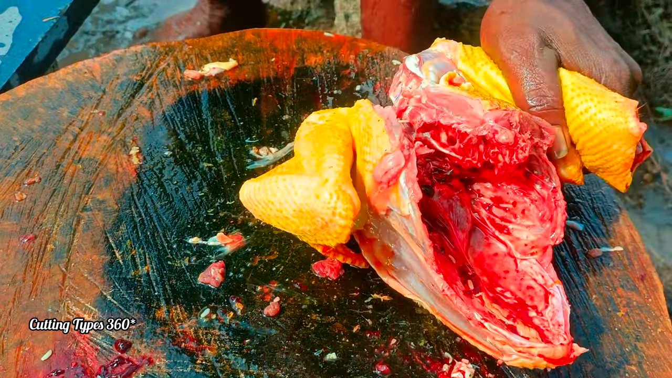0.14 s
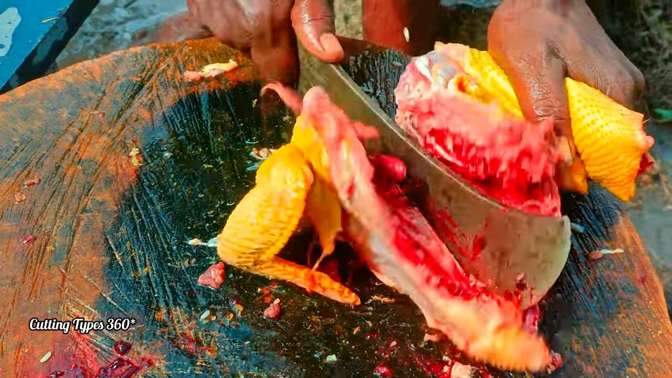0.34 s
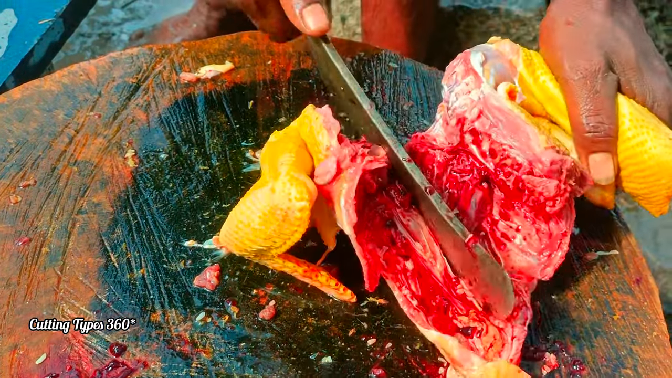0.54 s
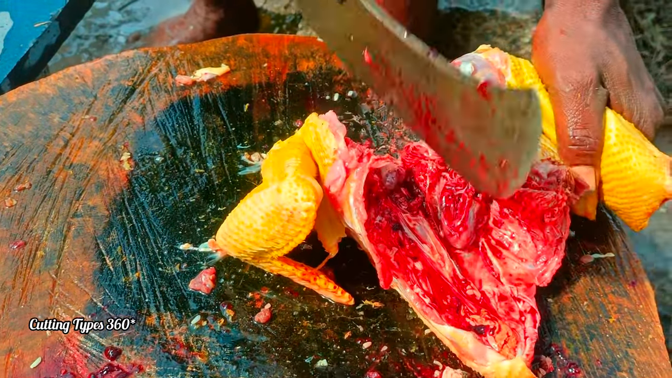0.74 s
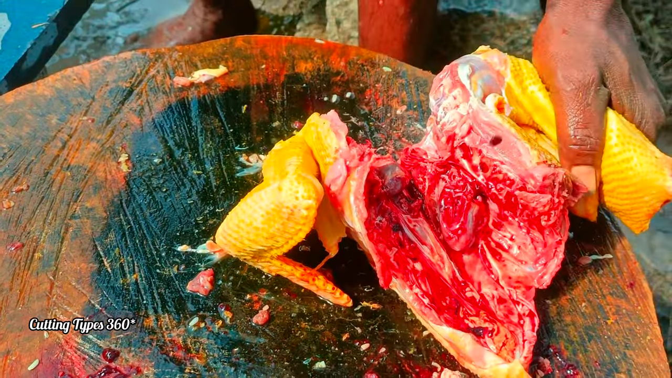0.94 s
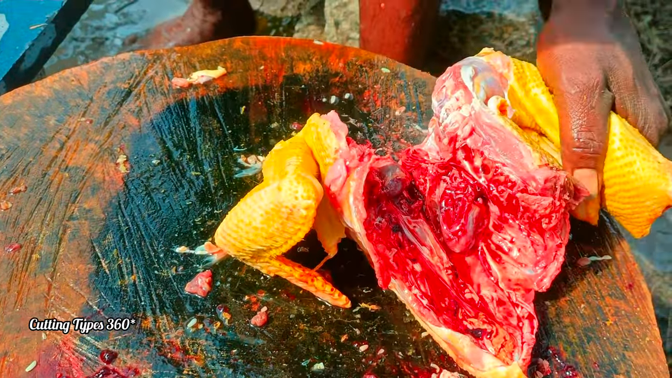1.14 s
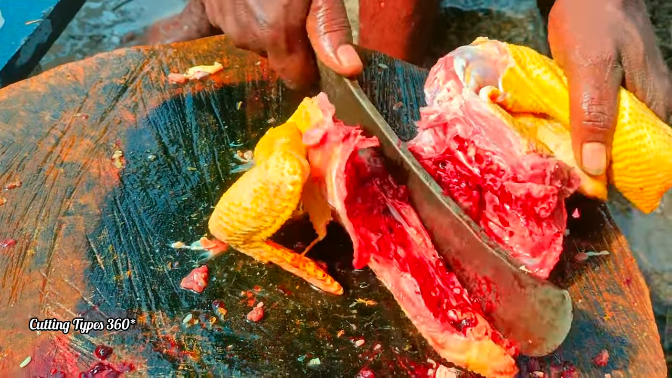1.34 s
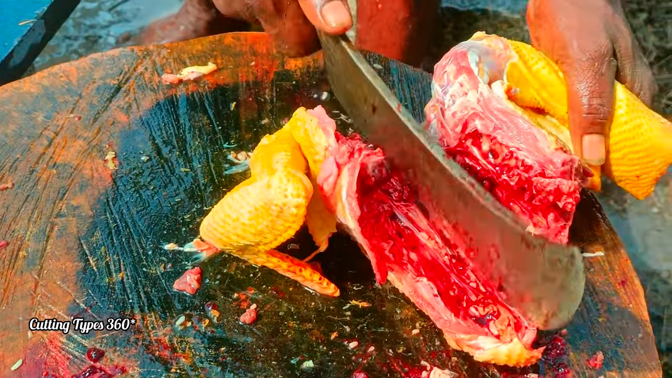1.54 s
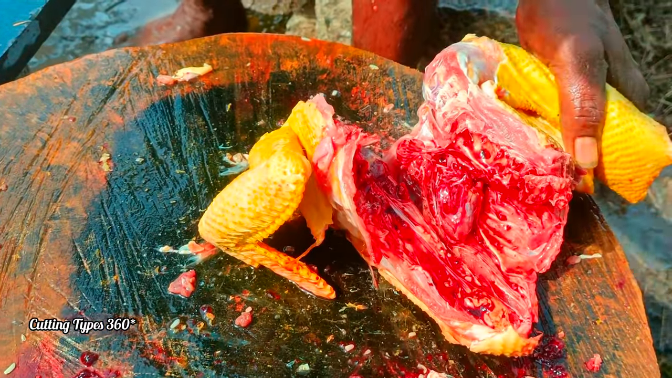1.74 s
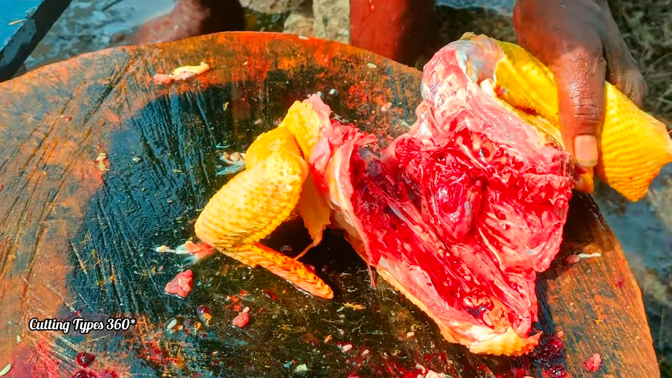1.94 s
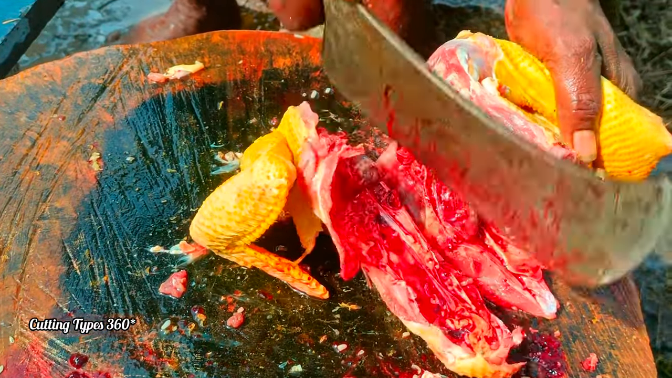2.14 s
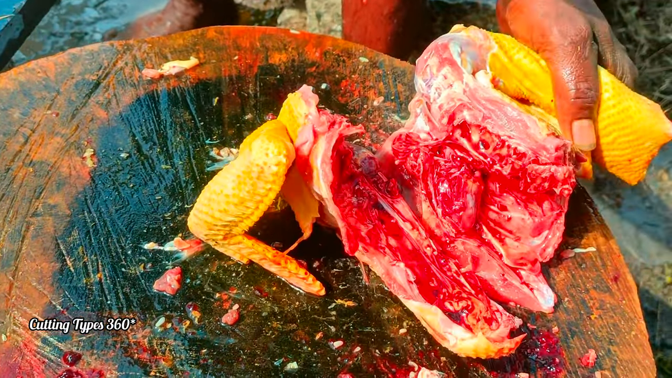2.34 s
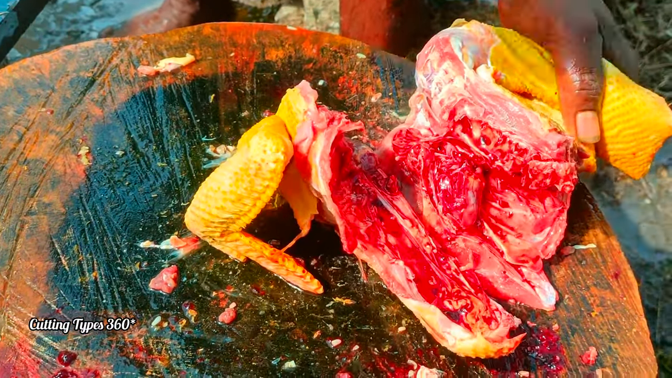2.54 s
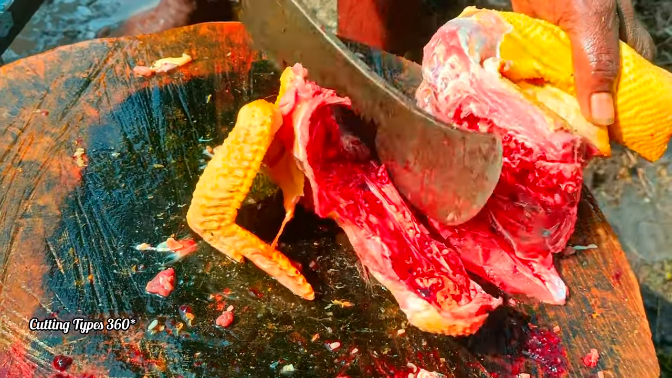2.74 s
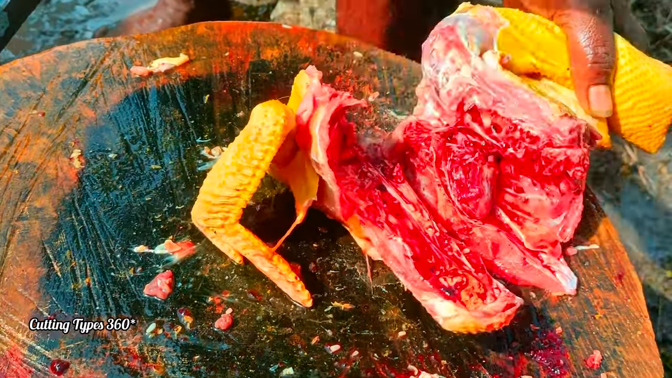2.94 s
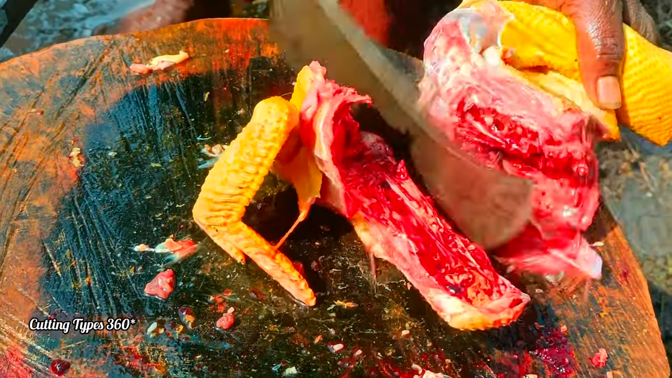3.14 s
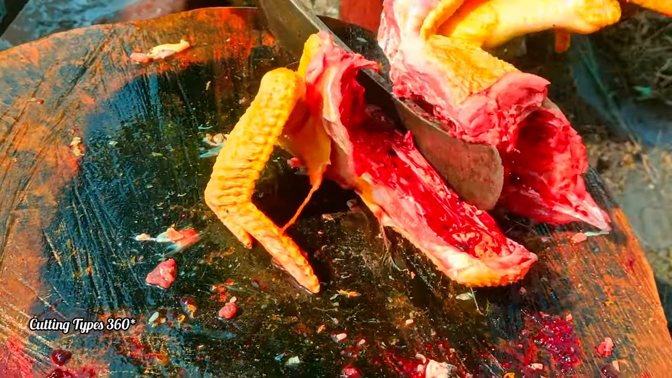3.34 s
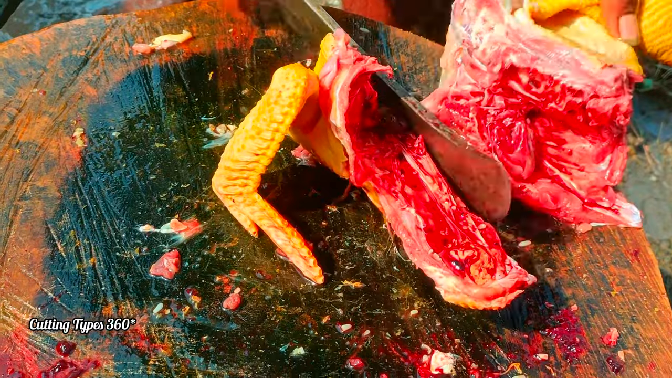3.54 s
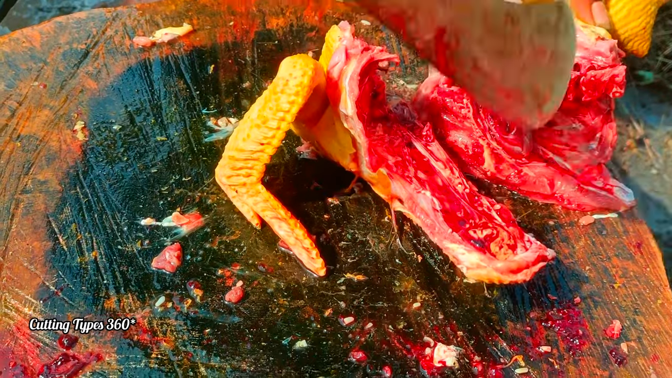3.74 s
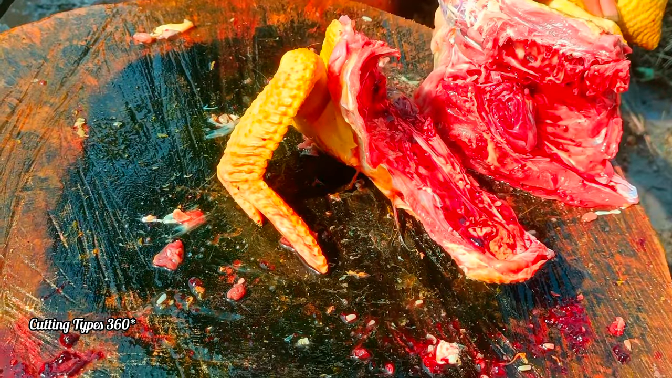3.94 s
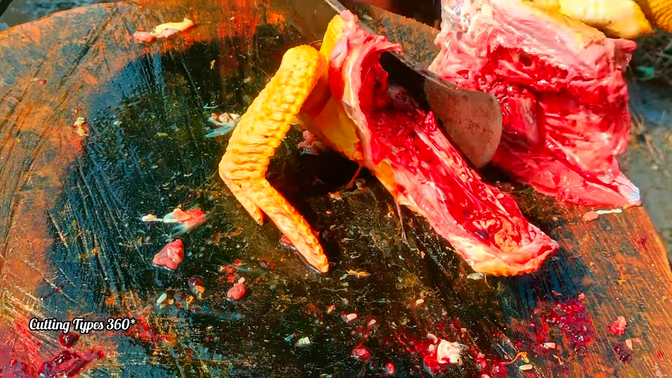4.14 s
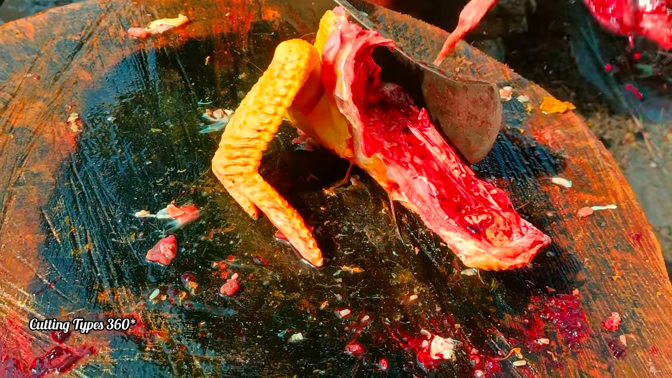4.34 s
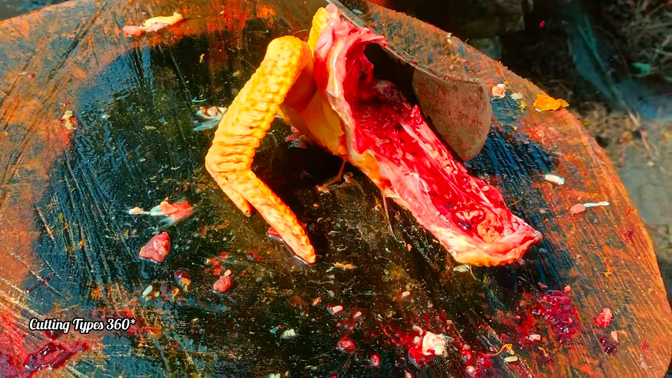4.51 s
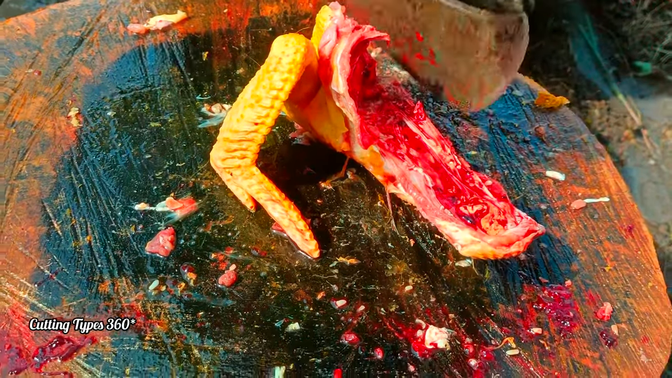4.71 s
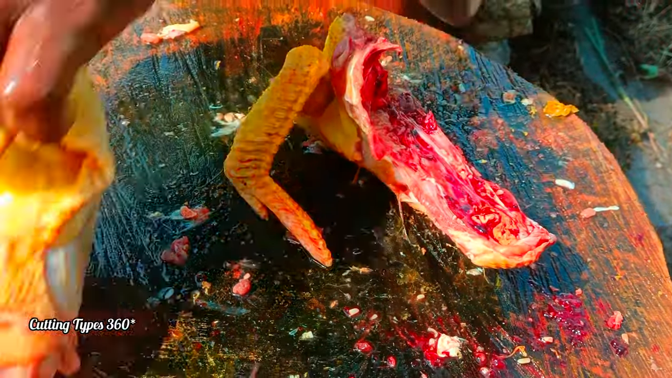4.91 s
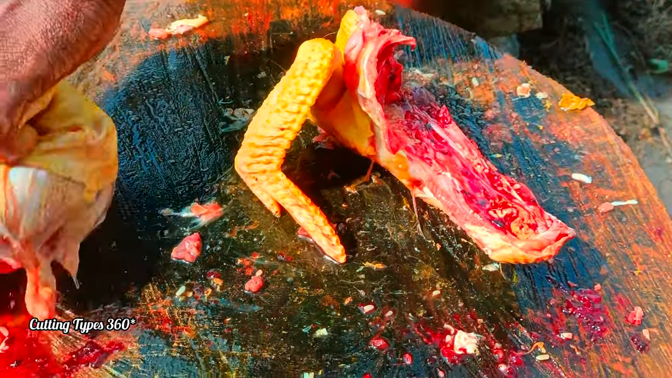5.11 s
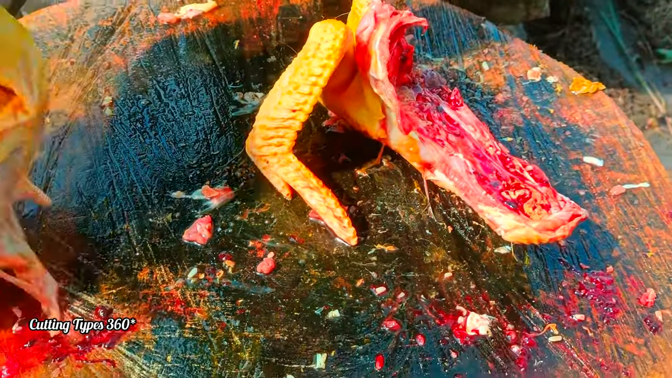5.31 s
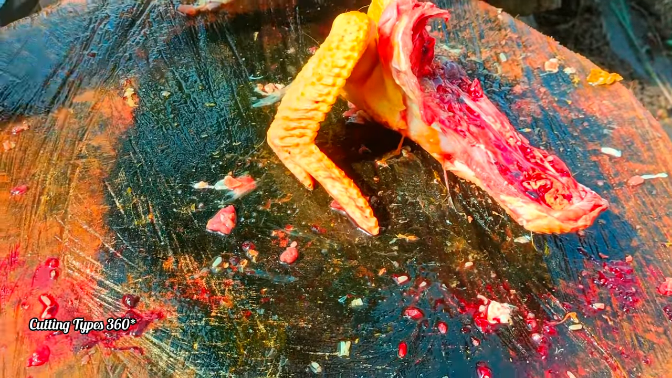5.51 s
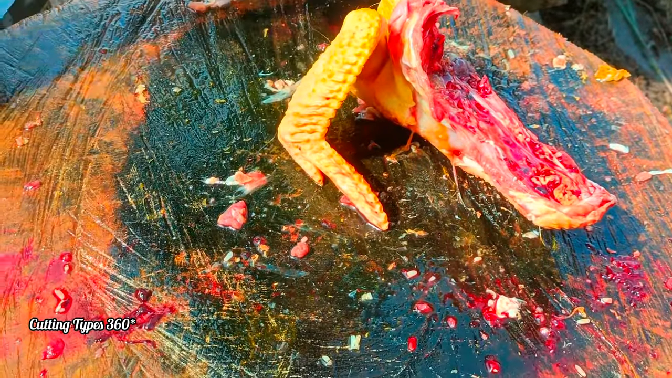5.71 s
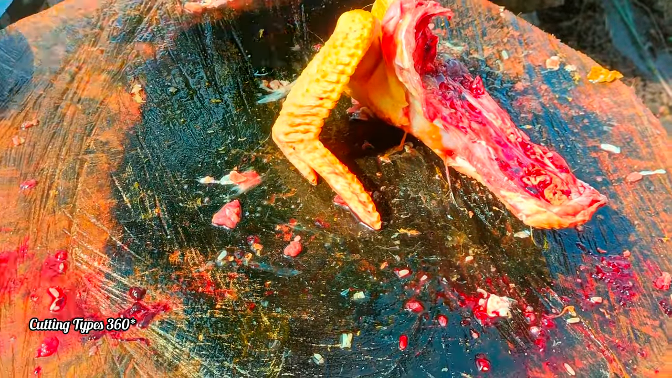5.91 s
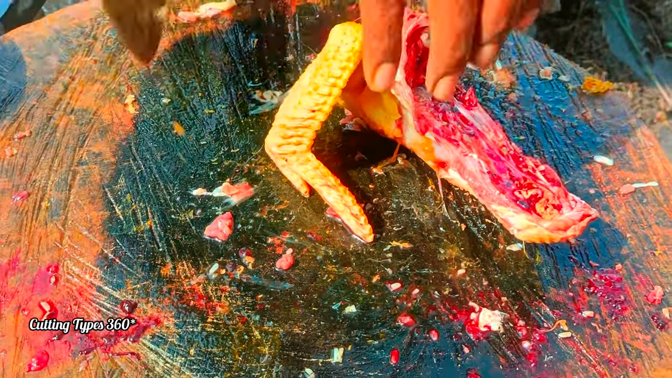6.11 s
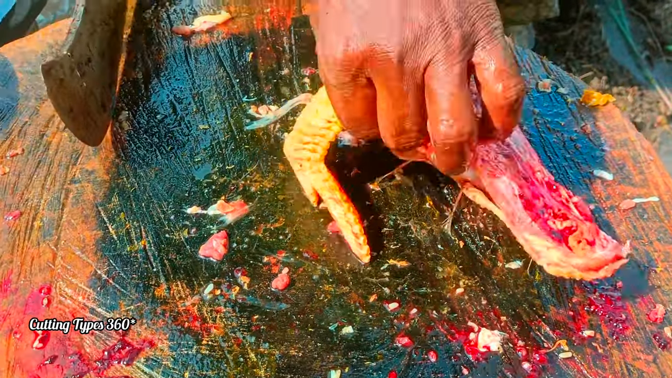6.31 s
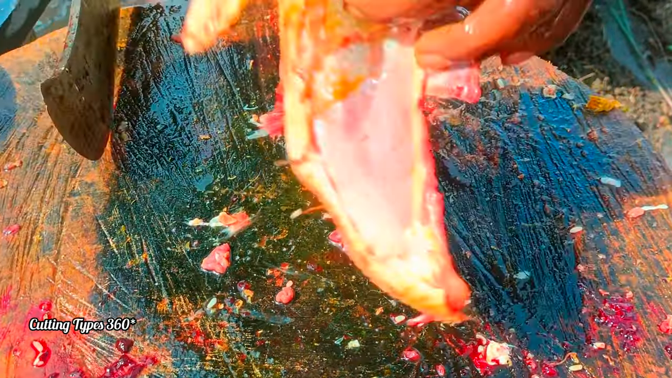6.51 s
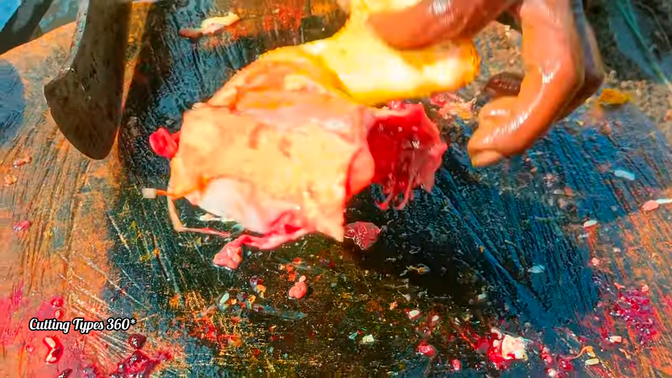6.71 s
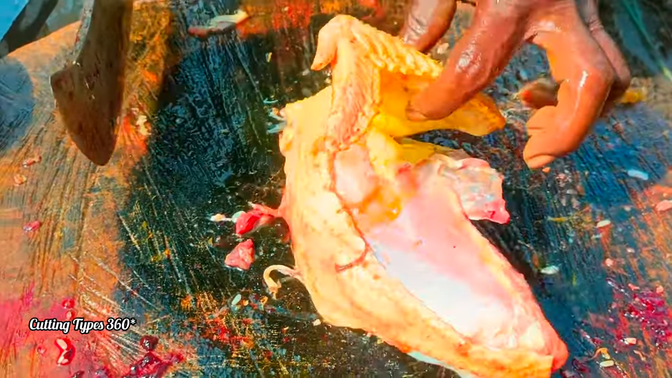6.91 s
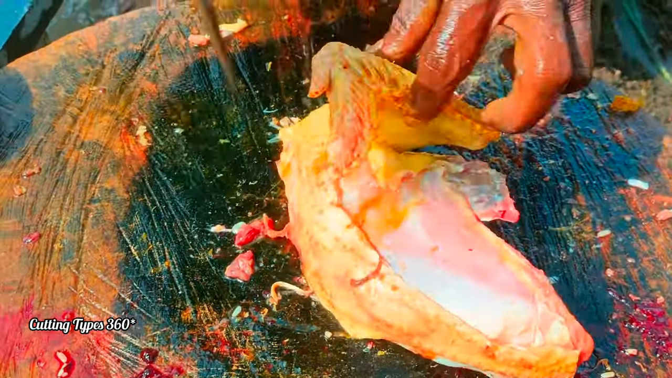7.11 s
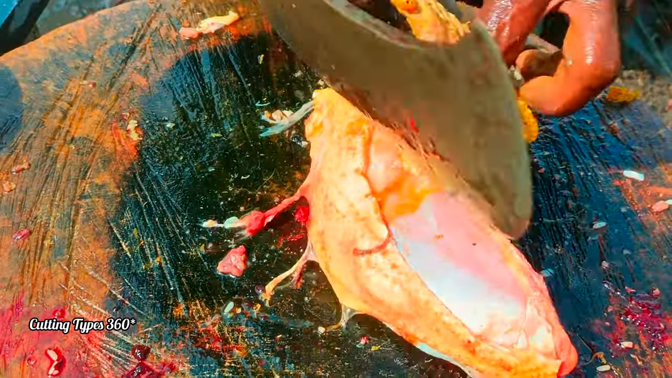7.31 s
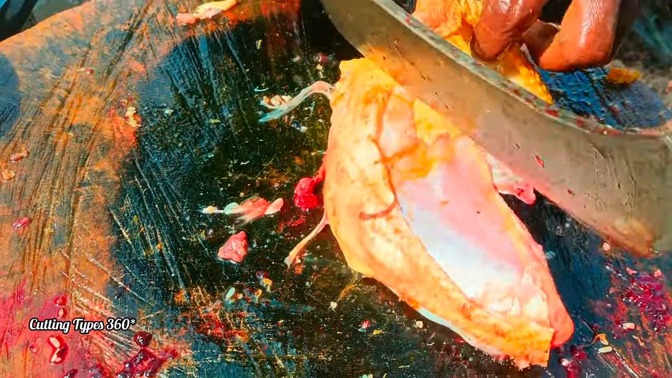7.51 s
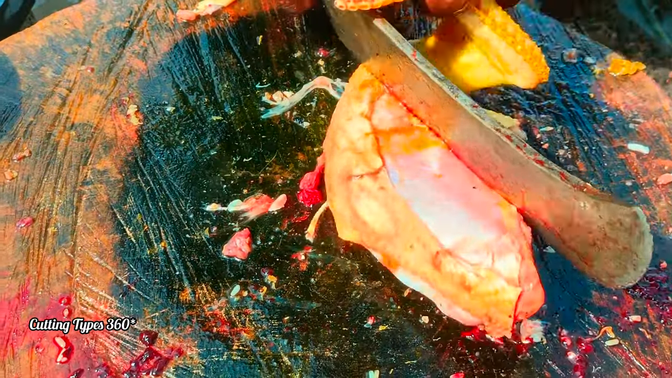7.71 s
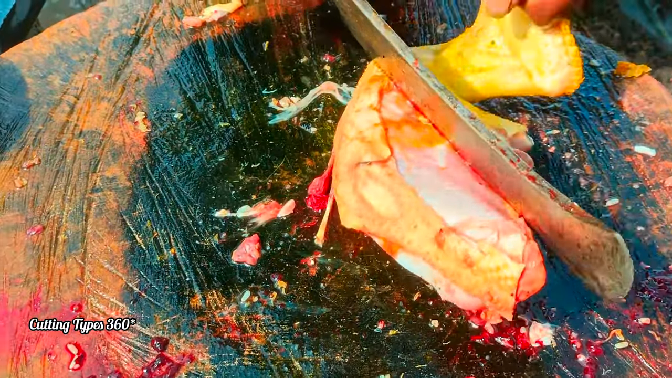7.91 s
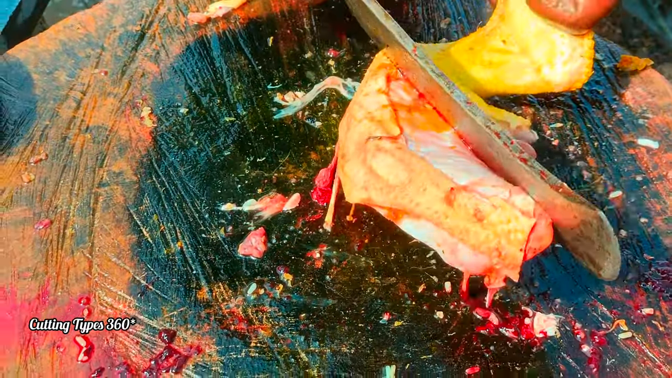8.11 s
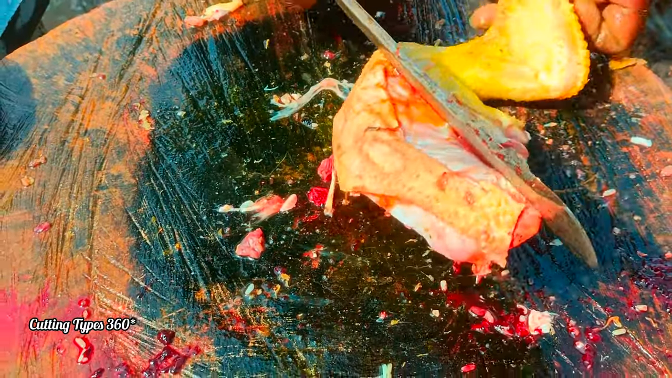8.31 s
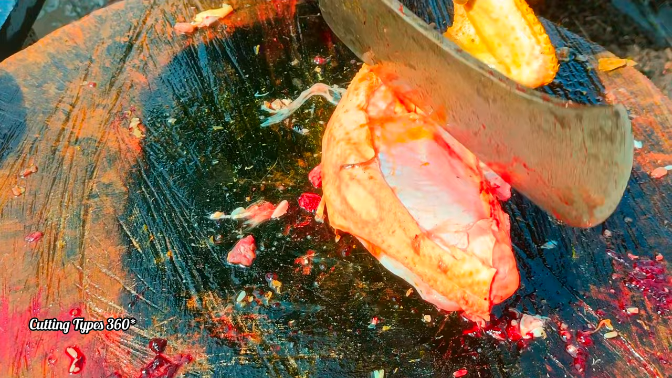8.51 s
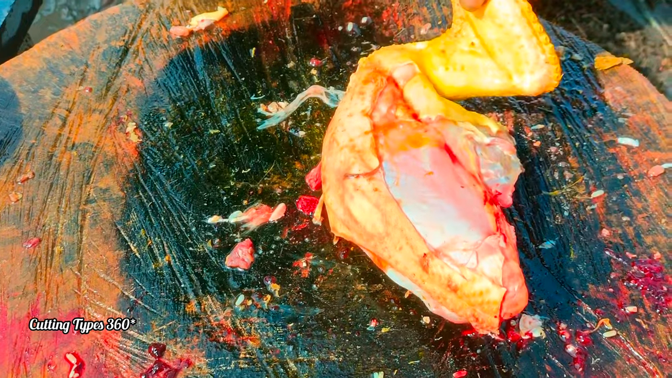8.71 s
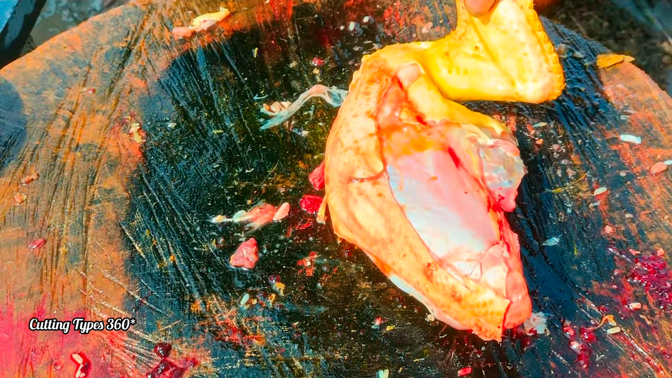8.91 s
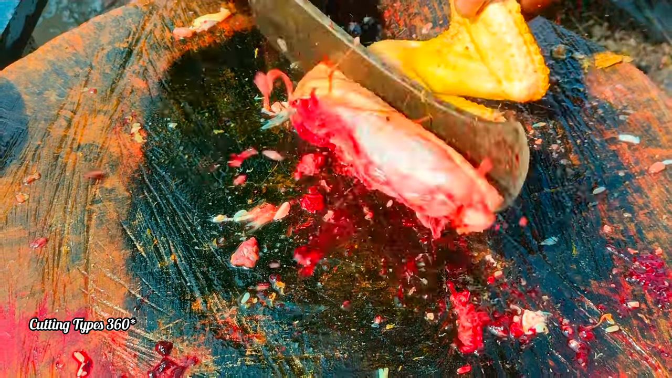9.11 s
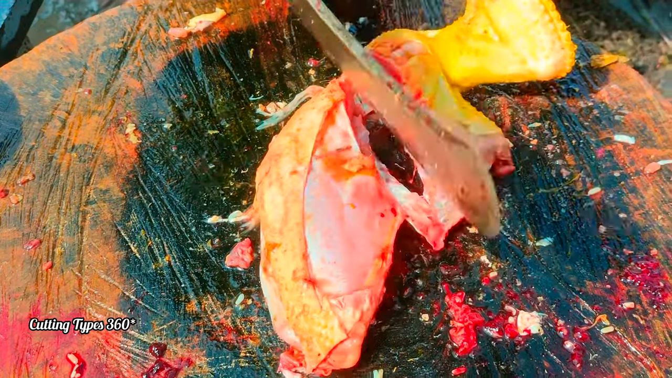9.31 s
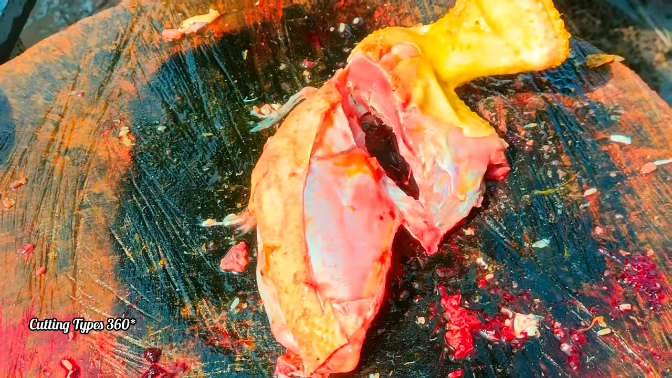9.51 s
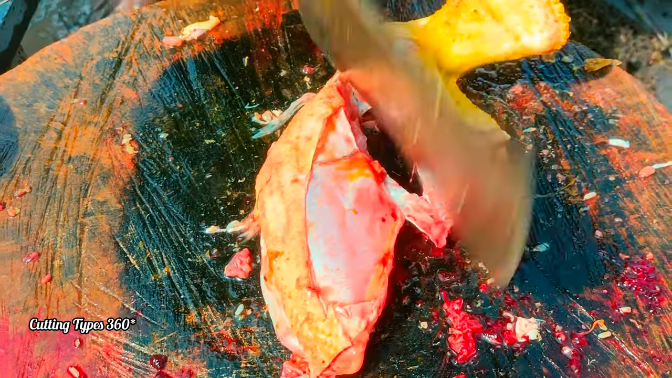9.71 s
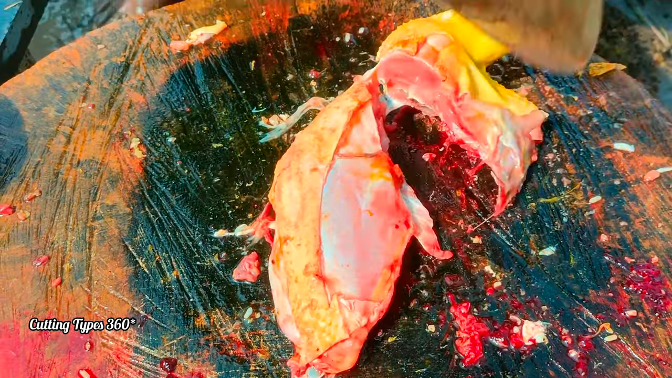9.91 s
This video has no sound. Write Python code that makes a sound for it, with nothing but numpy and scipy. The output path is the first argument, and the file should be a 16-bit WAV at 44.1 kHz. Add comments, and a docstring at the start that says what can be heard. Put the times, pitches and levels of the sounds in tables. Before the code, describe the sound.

Separate cleaver strokes land on a thick wooden block, each a tight bony crack with a hard woody thud and brief metallic edge. Small scrapes, ticks and wet presses fill the pauses. In the middle the chopping stops, leaving a thin surging hiss, faint rustling and a light knock as the blade is set down. Chopping returns near the end. Close stereo microphone, open yard, short wall reflection.

```python
"""Cleaver on a tree-stump block

A heavy cleaver chops a chicken outdoors, heard close up as shaped noise for the crunch through bone and
the ringing blade, then decaying modes for the stump; scattered noise answers from the yard and a wall.
Between chops come damped pops, crackling squelches, scrapes, short ticks and a faint rustle of handling.
For a while a thin noise hiss flutters, surges and whistles over the steady outdoor background."""
import sys
import numpy as np
from scipy import signal
from scipy.fft import rfft, irfft
from scipy.io import wavfile
from scipy.ndimage import uniform_filter1d, minimum_filter1d

SR = 44100
rng = np.random.default_rng(int(sys.argv[2]) if len(sys.argv) > 2 else 0)


def store_wav(level_fs):
    """Save 16-bit WAV to argv[1]."""
    pcm = np.round(np.clip(np.atleast_2d(level_fs), -1, 1) * 32767)
    wavfile.write(sys.argv[1], SR, pcm.T.astype(np.int16))


N = 438794
LEAD_S = .04  # room ahead of each landing for the cut


def amp(db):
    """Decibels to gain."""
    return 10 ** (np.asarray(db) / 20)


def evened(x):
    """Scales to rms 1."""
    return x / np.sqrt(np.mean(x ** 2) + 1e-20)


def read(points, hz, column=1):
    """One column of a spectrum, joined on a log-frequency axis."""
    table = np.transpose(points)
    return np.interp(np.log(hz + 1), np.log(table[0] + 1), table[column])


def freqs(size):
    """Frequencies of the bins of a real transform."""
    return np.fft.rfftfreq(size, 1 / SR)


def colour(x, gain):
    """Filters by a gain per bin."""
    return irfft(rfft(x) * gain, x.shape[-1])


def band(x, hz, octaves):
    """A bell-shaped band around hz, at rms 1."""
    distance = np.log2((freqs(x.shape[-1]) + 1) / hz) / octaves
    return evened(colour(x, np.exp(-.5 * distance ** 2)))


def pan(db):
    """Left and right gains for a left-right level difference."""
    return amp(np.array([[.5], [-.5]]) * db)


def add(mix, s, sound):
    """Adds a sound to the mix at time s."""
    start = round(s * SR)
    part = mix[:, start:start + sound.shape[-1]]
    part += sound[..., :part.shape[1]]


def envelope(start, end, rise, release):
    """Rises from start, holds until end, then dies away."""
    t = np.arange(N) / SR
    return np.clip((t - start) / rise, 0, 1) * np.exp(-np.maximum(t - end, 0) / release)


def waver(hz):
    """Slow random motion of rms 1, up to about hz."""
    return evened(colour(rng.standard_normal(N), np.exp(-(freqs(N) / hz) ** 2)))


def steady(table, likeness=0.69):
    """Partly shared noise, with a spectrum of its own at each microphone port."""
    shared, left, right = rng.standard_normal((3, N))
    noise = evened(likeness * shared + np.array([left, right]))
    spectrum_db = [read(table, freqs(N), 1), read(table, freqs(N), -1)]
    return colour(noise, np.sqrt(SR / 2) * amp(spectrum_db))


def snaps(size, grain_db=5.0, apart=0.9):
    """Dense crackle of grains of uneven size, heard a little differently at each port."""
    grain = amp(grain_db * np.minimum(rng.exponential(1, size), 4))
    shared, left, right = rng.standard_normal((3, size)) * grain
    return shared + apart * np.array([left, right])


def air():
    """Outdoor background of steady noise; its left side sinks near the end."""
    # outdoor spectrum, left before its level curve:
    # (frequency [Hz], left level [dB per Hz], right level [dB per Hz])
    air_spectrum = [(20, -98, -101.5), (119, -90, -85.5), (250, -101, -99), (1010, -101, -96),
                    (2160, -103, -96), (3800, -103, -93.5), (4300, -106, -92.5), (6000, -111, -105),
                    (6500, -110, -121), (7600, -108, -129), (10900, -116, -128), (16000, -121, -119)]
    # level curve of the left side: (time [s], level [dB])
    left_dip = [(0, 2.5), (9.1, 1.5), (9.3, -10), (9.7, -4), (9.95, -10)]
    left, right = steady(air_spectrum)
    left_db = np.interp(np.arange(N) / SR, *np.transpose(left_dip))
    return np.array([left * amp(left_db), right])


def pop(db, hz, t60, octaves=1.0, tick_db=-3, tick_s=.00016, tick_hz=2500):
    """A heavily damped ring, roughened by a band of noise; the louder it is, the more a tick opens it."""
    t = np.arange(SR // 10) / SR
    rough = .3
    onset = np.minimum(t * hz * 2, 1)  # swells over half a cycle
    tone = np.sin(2 * np.pi * hz * t) + rough * band(snaps(len(t)), hz, octaves)
    # db counts twice for the tick: here and in the overall level
    tick = amp(tick_db + db) * np.exp(-t / tick_s) * band(snaps(len(t)), tick_hz, .76)
    return amp(db) * (amp(-60 * t / t60) * onset * tone + tick)


def taps(pop_cycles=3.43, pop_side_db=-29, knock_t60_s=0.017, knock_side_db=1):
    """Damped rings: pops to the right, where low ones last longer, and blade knocks mid-field."""
    # damped pops, a click and low pushes, to the right:
    # (time [s], level before panning [dB], pitch [Hz])
    pops = [(.183, -34, 468), (.283, -14, 314), (.312, -25.5, 88), (2.817, -40, 179.6), (4.366, -38.5, 650),
            (4.509, -20, 530), (4.5259, -12.5, 404), (4.5375, -13, 465), (4.5361, -11.5, 1740),
            (4.5455, -6.5, 3530), (4.5519, -18, 443), (4.558, -23, 340), (4.6004, -36, 380),
            (4.738, -37.5, 686), (4.898, -39, 527), (5.538, -27.5, 4000), (5.645, -39.5, 538),
            (5.823, -43.5, 519), (6.1, -43, 549), (8.278, -29.5, 710), (8.578, -42.5, 489),
            (9.102, -22, 106.3), (9.659, -35, 496)]
    # light knocks of the blade on the block: (time [s], level before panning [dB], pitch [Hz])
    blade_knocks = [(1.352, -37, 910), (4.812, -43.5, 794), (7.5783, -23.5, 1260), (7.6111, -32.5, 1350),
                    (8.5072, -34, 760)]
    out = np.zeros((2, N))
    for s, db, hz in pops:
        add(out, s, pan(pop_side_db) * pop(db, hz, pop_cycles / hz))
    for s, db, hz in blade_knocks:
        add(out, s, pan(knock_side_db) * pop(db, hz, knock_t60_s))
    return out


def swell(length, hz, octaves, clump_db=4.0):
    """A band of clumped crackle that rises quickly and fades."""
    u = np.arange(SR // 3) / SR / length
    shape = (3 * u) ** 2 * np.exp(2 - 6 * u)  # crests at 1 after a third of the length
    clumps = amp(clump_db * evened(uniform_filter1d(rng.standard_normal(len(u)), size=200)))
    crackle = band(clumps * snaps(len(u), grain_db=4.0), hz, octaves)
    return evened(shape * crackle) * np.sqrt(np.mean(shape ** 2))


def strokes(rows, octaves, side_db):
    """Swells of crackle that share one bandwidth and one place."""
    out = np.zeros((2, N))
    for s, db, hz, length in rows:
        add(out, s, amp(db) * swell(length, hz, octaves))
    return pan(side_db) * out


def handling(tick_s=0.0065, tick_octaves=0.93):
    """Crackle swells: broad for squelches, bumps and ticks, narrower for scrapes and rubs."""
    # dull bumps of shifting the carcass:
    # (time [s], crest level before panning [dB], centre [Hz], nominal length [s])
    bumps = [(.198, -54.5, 433, 0.049), (4.488, -47, 450, 0.15), (4.685, -57, 450, .11),
             (9.001, -53, 387, 0.079), (9.274, -47, 485, .008)]
    # short bright ticks: (time [s], crest level before panning [dB], centre [Hz], left-right level [dB])
    ticks = [(0.225, -38, 2310, 15.5), (0.467, -41, 3600, -5), (7.932, -44.5, 14000, 0),
             (7.954, -50.5, 6480, -8.5), (9.066, -43, 10000, -6), (9.272, -28, 2370, 2.5)]
    # wet flesh pulled or pressed; columns as for the bumps
    squelches = [(.2805, -28.5, 2600, 0.0041), (.362, -35.5, 2560, 0.052), (.563, -52, 3840, 0.12),
                 (4.5203, -29, 3300, 0.0086), (4.662, -49.5, 3100, 0.1), (5.536, -43, 3680, 0.026),
                 (6.296, -54, 2330, 0.079), (6.812, -42, 2600, 0.026), (6.828, -35.5, 2100, .044),
                 (7.08, -53.5, 4120, 0.038), (8.948, -54.5, 5985, 0.028), (8.998, -44, 1490, 0.057)]
    # narrow bands of crackle: thin scrapes, and a bright crunch just before one chop; columns as above
    scrapes = [(.469, -45, 3700, 0.01), (.6, -59, 3500, 0.1), (1.42, -65.5, 3620, .15),
               (1.562, -51.5, 3740, 0.002), (1.599, -51.5, 3420, .004), (2.665, -50.5, 3530, .11),
               (3.161, -28.5, 6850, .018), (4.675, -53.5, 4020, 0.085), (6.836, -39.5, 3780, 0.033),
               (8.998, -47.5, 5090, 0.067)]
    # blade rubbing on the wood; columns as for the bumps
    rubs = [(3.476, -51, 1190, 0.088), (7.571, -40, 1368, 0.032), (8.505, -36, 972, 0.019)]
    out = strokes(squelches, octaves=0.94, side_db=-2)
    out += strokes(bumps, octaves=0.92, side_db=-15)
    out += strokes(scrapes, octaves=0.12, side_db=-11)
    out += strokes(rubs, octaves=0.36, side_db=-2)
    for s, db, hz, side_db in ticks:
        add(out, s, pan(side_db) * amp(db) * swell(tick_s, hz, tick_octaves))
    return out


def cut(length, crunch_db, ring_db, ring_hz, bone_db, bone_hz, swell_db=-19, swell_s=0.0061,
        release_s=0.00072, ring_octaves=0.021, bone_octaves=0.53):
    """The edge grinds through bone until the wood stops it; returns crack and blade ring."""
    # crunching bone, before levelling: (frequency [Hz], relative level [dB per Hz])
    crunch_spectrum = [(70, -25.5), (200, -4), (800, -1), (1400, -6.5), (2600, -7.5), (3800, 2.5),
                       (5200, -7.5), (7000, -16.5), (11000, -21.5), (16000, -18.5)]
    size = 4096
    t = np.arange(size) / SR - LEAD_S  # zero when the blade lands on wood
    in_bone = np.clip((t + length) / 0.00016, 0, 1) * np.exp(-np.maximum(t, 0) / release_s)
    # a faint noise swell around the onset of the crunch
    around_onset = amp(swell_db) * np.exp(-abs(t + length) / swell_s)
    grinding = in_bone + around_onset
    fractures = snaps(size, grain_db=11.0, apart=1.0)
    crunch = grinding * colour(fractures, amp(read(crunch_spectrum, freqs(size))))
    bone = grinding * band(snaps(size, apart=.5), bone_hz, bone_octaves)
    ring = in_bone * band(snaps(size, apart=0.94), ring_hz, ring_octaves)
    duty = np.sqrt(np.mean(in_bone ** 2))  # sets levels by the time spent in bone
    crack = amp(crunch_db) * evened(crunch) + amp(bone_db) * evened(bone)
    return duty * crack, duty * amp(ring_db) * evened(ring)


def thump(contact, spot_hz, spot_db=5.0, spot_octaves=0.17, uneven_db=1.5, grip_s=0.033, low_hz=145):
    """One push rings the stump; a longer contact is duller, and each spot favours other modes."""
    # modes of the stump on its stand, before chance and the struck spot shift them:
    # (frequency [Hz], level [dB], 60 dB decay before the blade's grip [s])
    stump_modes = [(133, -35, 0.36), (178, -26, 0.42), (224.1, -19, 0.61), (275.4, -12.5, .12),
                   (337.4, -12.5, 0.063), (406, -21, 0.17), (481, -22, .08), (539, -27, 0.17),
                   (593, -25, .2), (681, -28.5, 0.42), (740.6, -28.5, 0.17), (1082, -28, .14),
                   (1305, -26, .08), (1535, -26, .09), (1884, -25, 0.18), (2090, -26, .08)]
    t = np.arange(SR // 3) / SR
    hz, db, t60 = np.transpose(stump_modes)[:, :, None]
    favoured_db = spot_db * np.exp(-(np.log2(hz / spot_hz) / spot_octaves) ** 2)
    db = db + uneven_db * rng.standard_normal(hz.shape) + favoured_db
    low = hz < 700
    grip = 1 / (1 + low * (t / grip_s) ** 4)  # the lodged blade damps the low modes
    hz = hz * (1 + .006 * rng.standard_normal(hz.shape))
    ring = (amp(db - 60 * t / t60) * grip * np.cos(2 * np.pi * hz * t)).sum(0)
    push = np.exp(-np.pi * ((t[:SR // 20] - LEAD_S) / contact * 2) ** 2)
    wood = signal.fftconvolve(ring, push / push.sum())
    # the thump carries little deep bass
    return signal.sosfilt(signal.butter(2, low_hz, "high", fs=SR, output="sos"), wood)


def yard(x, scatter_db=0.0, first_s=0.0017, wall_s=.027, wall_db=3.5, wall_width_s=.008,
         far_db=-30, far_t60=0.92, apart=0.92):
    """Scatter from the ground and things close by, a hump from a wall, and a faint distant tail."""
    # close scatter: (frequency [Hz], relative level [dB], 60 dB decay [s])
    yard_scatter = [(60, -25, 0.87), (250, -15, 0.22), (500, -2.5, 0.08), (930, -5, 0.11), (1700, -4, 0.12),
                    (3500, -6, 0.14), (5500, -5.5, .13), (9110, -10, 0.17), (16000, -8.5, .12)]
    size = SR * 2 // 3
    pulses = rng.choice([-1., 1.], (3, size)) * (rng.random((3, size)) < 5000 / SR)  # 5000 a second
    shared, left, right = pulses
    hz, t, z = signal.stft(evened(shared + apart * np.array([left, right])), SR, nperseg=256)
    near_decay = amp(-60 * t / read(yard_scatter, hz, -1)[:, None])
    far_decay = amp(far_db - 60 * t / far_t60)
    level = amp(read(yard_scatter, hz))[:, None]
    tail = signal.istft(z * (near_decay + far_decay) * level, SR, nperseg=256)[1]
    t = np.arange(tail.shape[1]) / SR
    wall = amp(wall_db * np.exp(-((t - wall_s) / wall_width_s) ** 2))
    tail *= np.minimum(t / first_s, 1) ** 2 * wall
    return amp(scatter_db) / np.sqrt(SR * 0.0054) * signal.fftconvolve(x, tail, axes=1)[:, :N]


def chops(crack_echo_db=-3, thump_echo_db=-11, ring_echo_db=-8.5):
    """Each row mixes a crack, a blade ring and a stump thump; the yard answers each a little differently."""
    # one row a chop, or a knock of the cleaver set down on the block (6.24 s):
    # (landing on wood [s], cutting before that [s], crunch level [dB], blade ring level [dB],
    # blade ring pitch [Hz], hollow bone crack level [dB], its centre [Hz], thump level [dB],
    # contact time [s], pitch the struck spot favours [Hz], echo level [dB])
    landings = [(.3094, 0.0092, -8, -16, 2023, -15, 1500, -7.5, 0.0011, 300, -3),
                (1.2405, 0.0048, -12.5, -10, 3407, -17.5, 1510, 0, 0.00025, 620, -0.5),
                (2.0668, 0.0078, -20.5, -19, 3550, -15.5, 1288, 0, 0.00036, 745, -1),
                (2.618, 0.0064, -17.5, -17.5, 3510, -18.5, 1700, 1, 0.00046, 705, 1),
                (3.1718, 0.0082, -16.5, -19.5, 3830, -21.5, 1924, -1, 0.0015, 254, .5),
                (4.1561, .0044, -15.5, -30, 3550, -18.5, 1480, 3.5, 0.0016, 202, 0.5),
                (4.9839, 0.0093, -25.5, -33.5, 4600, -27.5, 1150, -41.5, 0.00032, 1110, -3.5),
                (6.2414, 0.0023, -45, -34, 3760, -32, 1220, -9.5, 0.00079, 290, -4.5),
                (9.103, 0.0061, -11, -39.5, 4207, -11, 1404, -11, .0007, 301, -4.5),
                (9.7699, 0.0044, -17.5, -21, 3970, -14, 1530, -2, 0.00087, 1512, 3)]
    out = np.zeros((2, N))
    for (s, length, crunch_db, ring_db, ring_hz, bone_db, bone_hz,
         thump_db, contact, spot_hz, echo_db) in landings:
        crack, ring = cut(length, crunch_db, ring_db, ring_hz, bone_db, bone_hz)
        wood = amp(thump_db) * thump(contact, spot_hz)
        sent = np.zeros((2, len(wood)))  # echo send
        for part, part_echo_db in (crack, crack_echo_db), (ring, ring_echo_db), (wood, thump_echo_db):
            add(out, s - LEAD_S, part)
            add(sent, 0, amp(echo_db + part_echo_db) * part)
        add(out, s - LEAD_S, yard(sent))
    return out


def whistle(age, width_hz=50, wander_hz=28, flutter_db=3.5, side_db=-16):
    """A narrow-band noise tone that catches in spells and sags in pitch with the age of the hiss."""
    # spells of whistling: (start [s], hold [s], level before flutter [dB])
    spell_rows = [(5.07, 0.032, -48.5), (5.2, .22, -56.5), (5.547, 0.53, -53.5), (6.15, 0.11, -53.5),
                  (6.397, .06, -61.5), (6.64, 0.067, -56.5), (6.928, .3, -57.5)]
    settled_hz, sharp_hz, settle_s = 4610, 390, 0.83
    rise_s, release_s = 0.053, 0.052
    hz = settled_hz + sharp_hz * np.exp(-age / settle_s) + wander_hz * waver(28)
    turn = 2 * np.pi * np.cumsum(hz) / SR
    tone = evened(waver(width_hz) * np.cos(turn) + waver(width_hz) * np.sin(turn))
    spells = sum(amp(db) * envelope(s, s + hold, rise_s, release_s) for s, hold, db in spell_rows)
    return tone * spells * amp(flutter_db * waver(11)) * amp([[side_db], [0]])  # fainter on the left


def hiss(flutter_db=2.1, treble_hz=6500, calm_treble_db=-11, surge_body_db=-5):
    """Noise with a fluttering body that weakens steadily, plus a whistle; surges add mostly treble."""
    # the thin hiss before flow and surges scale it:
    # (frequency [Hz], left level [dB per Hz], right level [dB per Hz])
    hiss_spectrum = [(139, -115, -108), (610, -101, -91), (830, -106, -102.5), (2700, -104, -90),
                     (2960, -101, -91), (4740, -100, -80), (6460, -108, -99.5), (7400, -101.5, -116),
                     (11400, -99.5, -108), (15600, -107, -101)]
    # bright surges: (start [s], hold [s], strength [dB], release [s])
    surge_rows = [(5.15, 0.17, 4, .04), (5.414, 0.18, 1.5, 0.064), (5.627, .08, -2.5, 0.31),
                  (6.029, 0.045, -0.5, 0.061)]
    start_s, end_s, rise_s, release_s = 5.05, 8.44, 0.066, 0.12
    start_db, fade_db_per_s = -3.5, 3.5
    surge_rise_s = 0.069
    age = np.maximum(np.arange(N) / SR - start_s, 0)
    running = envelope(start_s, end_s, rise_s, release_s)
    flow = running * amp(start_db - fade_db_per_s * age)
    surge = sum(amp(db) * envelope(s, s + hold, surge_rise_s, release)
                for s, hold, db, release in surge_rows)
    noise = steady(hiss_spectrum)
    treble = colour(noise, freqs(N) > treble_hz)
    body_level = np.hypot(flow, amp(surge_body_db) * surge) * amp(flutter_db * waver(19))
    treble_level = np.hypot(amp(calm_treble_db) * flow, surge)
    return body_level * (noise - treble) + treble_level * treble + whistle(age)


def fumbling(lumps_db=4.5, lumps_hz=12, side_db=-6, edge_s=0.066):
    """A faint lumpy noise rustle of hands and meat moving over the block."""
    # rustle while pieces are swapped, before lumps and panning: (frequency [Hz], level [dB per Hz])
    fumble_spectrum = [(20, -93), (70, -91.5), (150, -101), (450, -99), (1000, -110), (3000, -130)]
    start_s, end_s = 5.3, 7.5
    lumps = amp(lumps_db * np.tanh(waver(lumps_hz)))
    level = envelope(start_s, end_s, edge_s, edge_s) * lumps
    return pan(side_db) * level * steady(fumble_spectrum)


def ports(x, lead_s=.00009):
    """Two microphone ports colour the sound differently, and it reaches the left one first."""
    # how the ports differ: (frequency [Hz], left-right level [dB])
    port_difference = [(100, 0.5), (1000, -1.5), (2000, -4.5), (3600, -7.5), (5200, -12), (6400, -0.5),
                       (8000, 9), (11000, 14), (15000, -2)]
    hz = freqs(N)
    lead = np.exp(1j * np.pi * hz * lead_s * np.array([[1], [-1]]))  # half the lead on each side
    return colour(x, pan(read(port_difference, hz)) * lead)


def scene(small_echo_db=-12, pop_echo_db=-22):
    """Chops and handling sounds with their echo, through the two ports, over background and hiss."""
    wet, knocks = handling(), taps()
    small_echo = yard(amp(small_echo_db) * wet + amp(pop_echo_db) * knocks)
    close = chops() + wet + knocks + small_echo
    return ports(close) + air() + hiss() + fumbling()


def record(dry, low_cut_hz=45, edge_hz=16100):
    """A fast limiter holds the peaks on each channel; then the low cut and the band limit."""
    ceiling = .88
    gain = minimum_filter1d(ceiling / np.maximum(abs(dry), ceiling), size=45, axis=1)
    held = dry * uniform_filter1d(gain, size=45, axis=1)
    held = signal.sosfilt(signal.butter(2, low_cut_hz, "high", fs=SR, output="sos"), held)
    band_limit = signal.firwin(301, edge_hz, window=("kaiser", 9), fs=SR)
    return signal.oaconvolve(held, band_limit[None], "same")


dry = scene()
out = record(dry)
store_wav(out)
```